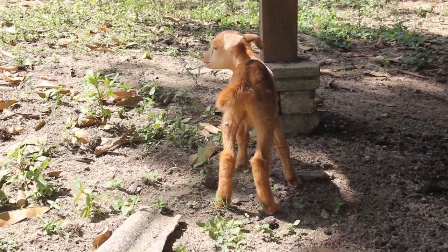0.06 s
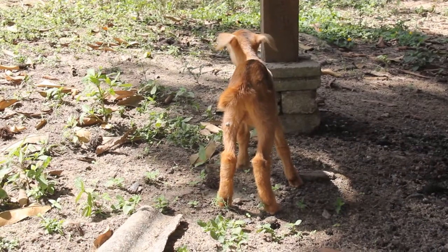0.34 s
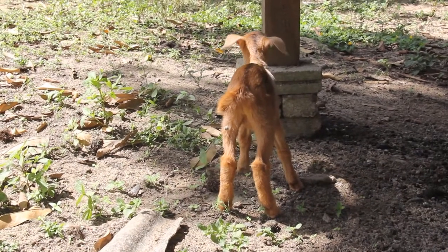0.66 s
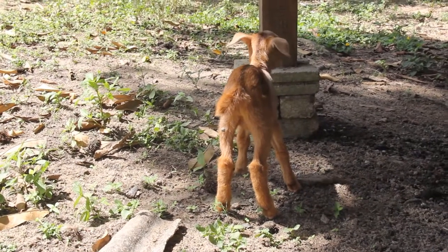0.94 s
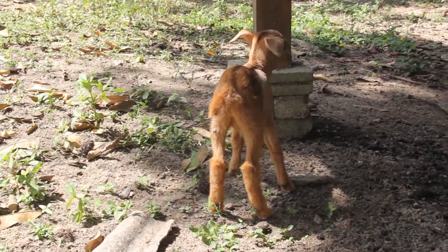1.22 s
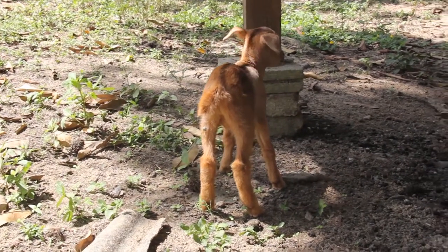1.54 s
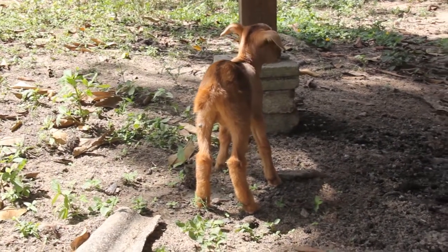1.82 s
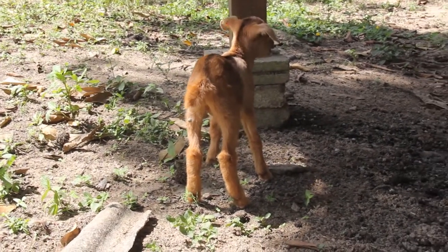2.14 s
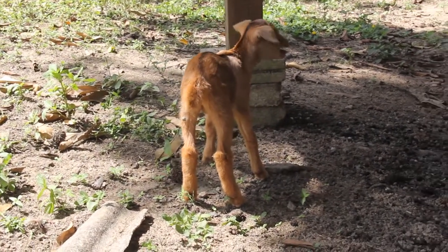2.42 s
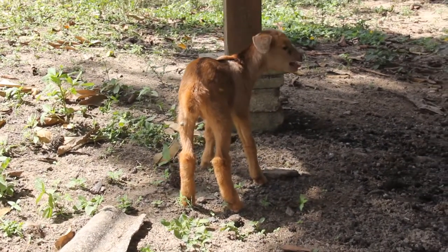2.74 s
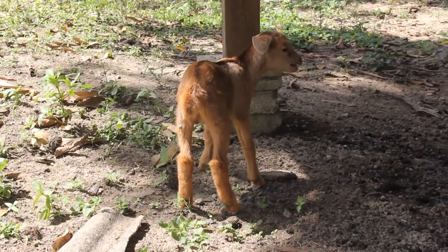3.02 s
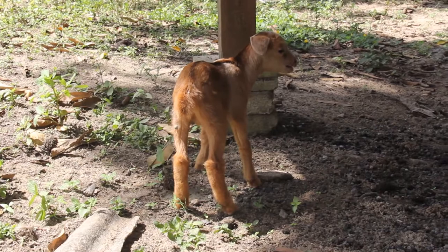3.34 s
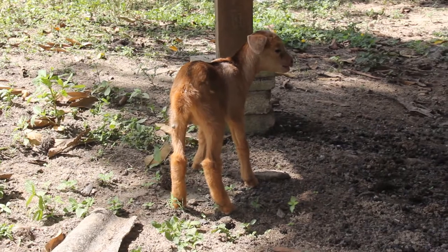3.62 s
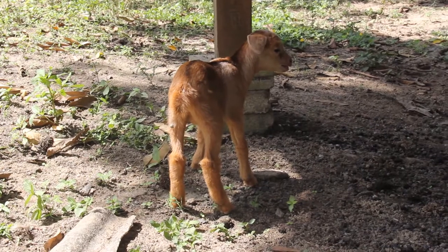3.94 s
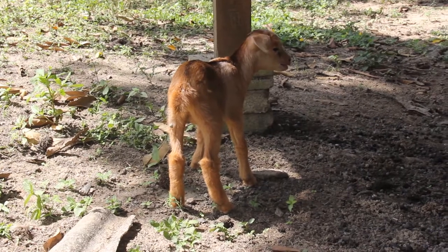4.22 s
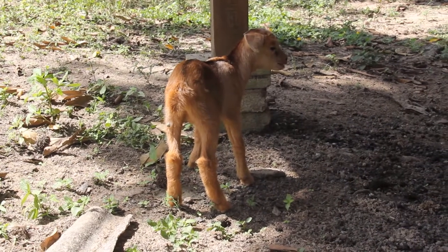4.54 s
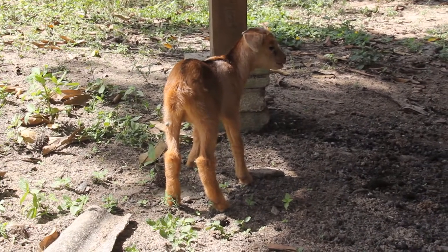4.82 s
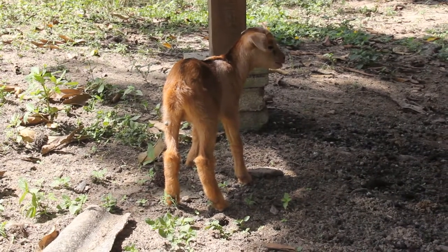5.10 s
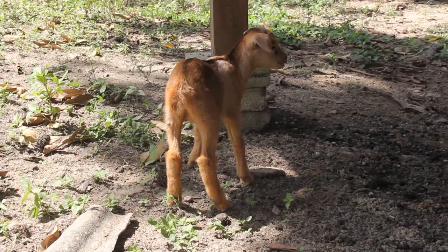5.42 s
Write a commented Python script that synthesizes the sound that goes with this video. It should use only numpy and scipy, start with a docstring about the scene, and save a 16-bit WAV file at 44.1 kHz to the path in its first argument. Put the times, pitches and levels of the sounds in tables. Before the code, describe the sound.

Faint bird whistles over soft air, then a goat kid bleats close by, a lower goat replies, and a turkey and hens call.

```python
"""A low stir of air, insects and a rustle in dry litter open a farmyard; a small bird gives falling whistles.
A goat kid bleats close by and an older goat answers; then a turkey gobbles and hens whine and cluck.
Goats and fowl follow the source-filter principle: vibrating membranes send pulses through a resonant
throat. The whistles are gliding sine tones; air, insects and rustles are filtered noise.
The sheds give a short echo."""
import sys
import numpy as np
from scipy import signal
from scipy.fft import rfft, irfft
from scipy.io import wavfile
from scipy.ndimage import uniform_filter1d

SR = 44100
rng = np.random.default_rng(int(sys.argv[2]) if len(sys.argv) > 2 else 0)


def unload_audio(sound):
    """Save the sound as a 16-bit wav file, at the path given as the first command line argument."""
    columns = np.transpose(np.atleast_2d(sound))
    # keep every value between -1 and 1, then stretch to whole-number steps
    steps = np.round(np.clip(columns, -1, 1) * 32767)
    wavfile.write(sys.argv[1], SR, steps.astype(np.int16))


N = 250047
TIME = np.arange(N) / SR
EDGE_HZ = 15850  # upper band limit

# Throbs of the kid's bleat: centre_s, relative_db, pitch_hz, bend_share, glide_share
KID_THROBS = [(2.174, -27, 742, -0.067, 0.088), (2.264, -12.5, 770, 0.039, 0.029),
              (2.358, -11, 708, 0.061, 0.015), (2.455, -10.5, 752, 0.011, 0.02),
              (2.556, -10, 768.5, 0.015, 0.014), (2.664, -13.5, 753, 0.041, 0.039),
              (2.764, -14.5, 765, 0.035, 0.00082)]


def gain_of(db):
    """Amplitude ratio: tenfold for every 20 decibels."""
    return 10 ** (np.asarray(db) / 20)


def unit_rms(x):
    """Normalisation to a mean power of 1."""
    return x / np.sqrt(np.mean(x ** 2) + 1e-20)


def value_at(points, hz):
    """Interpolation on a logarithmic frequency axis."""
    point_hz, value = np.transpose(points)
    return np.interp(np.log(hz + 1), np.log(point_hz + 1), value)


def add(mix, start_s, sound):
    """Superposition: a sound sums into the mix from start_s on."""
    part = mix[max(round(start_s * SR), 0):][:len(sound)]
    part += sound[:len(part)]


def band(x, low_hz, high_hz):
    """Zero-phase band-pass with fourth-order slopes."""
    hz = np.fft.rfftfreq(len(x), 1 / SR) + 0.0014
    return irfft(rfft(x) / np.sqrt((1 + (low_hz / hz) ** 8) * (1 + (hz / high_hz) ** 8)), len(x))


def wander(size, rate_hz):
    """Random modulation: noise of rms 1, band-limited to about rate_hz."""
    return unit_rms(band(rng.standard_normal(size), rate_hz / 20, rate_hz))


def resonate(x, spectrum, size=2048):
    """Minimum-phase filter: the peaks of the spectrum ring after each pulse."""
    log_gain = np.log(gain_of(value_at(spectrum, abs(np.fft.fftfreq(size, 1 / SR)))))
    taps = np.fft.ifft(np.exp(np.conj(signal.hilbert(log_gain)))).real
    return signal.oaconvolve(x, taps[:size // 2])[:len(x)]


def shelf(x, corner_hz, db):
    """Shelving filter: raises or lowers everything above the corner."""
    low = band(x, 0, corner_hz)
    return low + gain_of(db) * (x - low)


def air():
    """Broadband noise of stirring air, slowly modulated in level."""
    # Spectrum of the air: frequency_hz, density_db
    spectrum = [(15, -30), (25, -21.5), (126, -2.5), (324, -12.5), (672, -17.5), (769, -14), (857, -17),
                (1780, -23.5), (2090, -21.5), (2660, -23), (3580, -23.5), (4100, -28.5), (4950, -22),
                (5370, -28.5), (15800, -40)]
    stir = unit_rms(resonate(rng.standard_normal(N), spectrum, size=16384))
    return gain_of(-48) * stir * gain_of(1.9 * wander(N, 3.9))


def insects():
    """Narrow-band noise: a steady sizzle near 5 kHz."""
    # Spectrum of the insects: frequency_hz, gain_db
    spectrum = [(4000, -37.5), (4700, -1), (5050, -3), (5400, -30)]
    return gain_of(-64) * unit_rms(resonate(rng.standard_normal(N), spectrum))


def wind():
    """Turbulence on the microphone: two low noise bands that swell with the gusts."""
    # Gust strength: time_s, buffet_relative_db, rumble_relative_db
    gusts = [(0.0, -61, -43), (0.41, -81, -47), (0.6, -46, -51), (1.03, -47, -41), (1.07, -39, -39),
             (1.14, -61, -50), (1.61, -61, -45), (2.34, -58, -48.5), (2.37, -79, -63), (3.32, -53, -46),
             (4.01, -65, -50), (4.53, -65, -37), (4.64, -68, -49), (4.74, -58, -38), (4.81, -72, -45.5),
             (5.37, -58, -44.5), (5.43, -59, -50), (5.67, -51, -49)]
    time_s, buffet_db, rumble_db = np.transpose(gusts)
    buffet = unit_rms(band(rng.standard_normal(N), 52, 62))
    rumble = unit_rms(band(rng.standard_normal(N), 57, 133.5))
    buffet *= gain_of(np.interp(TIME, time_s, buffet_db) + 0.5)
    rumble *= gain_of(np.interp(TIME, time_s, rumble_db) - 2.5)
    return buffet + rumble


def rustles():
    """Friction in dry litter: grainy noise with a Gaussian rise and an exponential decay."""
    # Movements in the litter: peak_s, rise_s, decay_s, level_db, treble_db, fizz_db
    movements = [(.29, 0.017, 0.011, -44, -12, -5), (0.859, 0.017, 0.072, -47, -24, 0),
                 (1.461, 0.088, 0.2, -51.5, -2.5, 17), (1.85, 0.024, 0.0071, -40, -5.5, -8),
                 (3.73, 0.32, 0.21, -39, -5.5, 26), (4.697, 0.019, 0.038, -22, 11, 4),
                 (5.508, 0.028, 0.045, -42, -12, 26), (5.66, 0.013, 0.028, -43.5, -5, 26)]
    # Spectrum of the litter: frequency_hz, gain_db
    spectrum = [(300, -2), (1100, 1), (2200, -4.5), (3100, -17.5), (4000, -2), (4900, -6), (6300, -12.5),
                (8500, -21), (11000, -37.5), (15000, -61.5)]
    out = np.zeros(N)
    t = np.arange(-4096, 12288) / SR
    grains = resonate(rng.standard_normal(N) * gain_of(2.0 * wander(N, 600)), spectrum)
    for peak_s, rise_s, decay_s, db, treble_db, fizz_db in movements:
        swell = np.exp(-(np.minimum(t, 0) / rise_s) ** 2 - np.maximum(t, 0) / decay_s)
        swish = np.roll(grains, rng.integers(N))[:len(t)]
        swish = shelf(shelf(swish, 1300, treble_db), 8350, fizz_db)
        add(out, peak_s + t[0], gain_of(db) * unit_rms(swish) * swell)
    return out


def bird():
    """Frequency-modulated pure tones: a faint swoop from above, a fading slide, a downward flick."""
    # Whistles: start_s, length_s, relative_db, from_hz, to_hz
    whistles = [(0.438, 0.16, -35, 4096, 3305), (0.764, 0.038, -44, 3300, 2790),
                (1.128, 0.25, -35.5, 4093, 3382), (1.69, .18, -36, 4083, 3556),
                (2.093, 0.1, -44.5, 3560, 3130)]
    swoop_s, flick_s = .04, 0.0338
    swoop_db, fade_db = -18, -6
    out = np.zeros(N)
    for start_s, length_s, db, from_hz, to_hz in whistles:
        t = np.arange(-swoop_s, length_s, 1 / SR)
        progress = np.clip(t / length_s, 0, 1)
        swoop = np.sqrt(np.clip(-t / swoop_s, 0, 1))
        flick = np.clip(1 - (length_s - t) / flick_s, 0, 1)
        hz = from_hz + (to_hz - from_hz) * np.sqrt(progress)  # steepest at first
        hz *= 1 + .24 * swoop - 0.073 * flick
        hz *= 1 + 0.0084 * wander(len(t), 97)
        gate = np.clip((t + swoop_s) / 0.009, 0, 1) * np.clip((length_s - t) / 0.0053, 0, 1)
        level_db = db + swoop_db * np.clip(1 - t / 0.0034, 0, 1) + fade_db * progress
        level_db += 2.35 * wander(len(t), 42)
        tone = np.sqrt(2) * np.sin(2 * np.pi * np.cumsum(hz) / SR)
        add(out, start_s + t[0], gate * gain_of(level_db) * tone)
    return out


def folds(hz, rough, jitter, jitter_hz, closure_rad=.12):
    """Voice source: membranes give a pulse and a puff of noise each cycle. Returns wave and phase."""
    rough = np.clip(rough, 0, 1)
    cycles = np.cumsum(hz * (1 + jitter * np.sqrt(rough) * wander(len(hz), jitter_hz))) / SR
    phase = 2 * np.pi * cycles
    orders = range(1, int(EDGE_HZ / hz.min()) + 1)
    # slow closure delays the upper harmonics and spreads each pulse
    pulses = sum(np.cos(k * phase - closure_rad * k * k) * (k * hz < EDGE_HZ) for k in orders)
    puffs = (0.16 + np.exp(-(cycles % 1) / 0.094)) * rng.standard_normal(len(hz))
    buzz = shelf(unit_rms(pulses), 9800, db=-3.5)
    rasp = shelf(unit_rms(puffs), 6900, db=20)  # the voice is hoarsest at the top
    return (1 - rough) * buzz + rough * rasp, phase


def quaver(t, centre_s, pitch_hz, bend, glide, sag_ratio, bend_s):
    """Pitch modulation: a parabola (bend) and a slope (glide) through each throb, then a sag."""
    nearest = abs(t - centre_s[:, None]).argmin(0)
    offset = (t - centre_s[nearest]) / bend_s
    flank = np.clip(offset, -1, 1)
    curve = 1 + bend[nearest] * flank ** 2 + glide[nearest] * flank
    sag = 1 + (sag_ratio - 1) * np.clip(abs(offset) - 1, 0, 1)
    return uniform_filter1d(pitch_hz[nearest] * curve * sag, size=300)


def bleat(throbs, throat, width_s, bend_s, sag_ratio, slack_db, slack_rough,
          corner_hz, jitter, shimmer_db, closure_rad=.12):
    """Source-filter voice in throbs; between them it slackens, turning lower, hoarser and fainter."""
    centre_s, mouth_db, nose_db, treble_db, pitch_hz, bend, glide, rough = np.broadcast_arrays(*throbs)
    t = np.arange(round((centre_s[0] - .1) * SR), round((centre_s[-1] + .13) * SR)) / SR
    hz = quaver(t, centre_s, pitch_hz, bend, glide, sag_ratio, bend_s)
    offset = (t - centre_s[:, None]) / width_s
    push = np.exp(-abs(offset) ** 2.33)
    slack = gain_of(slack_db) * np.exp(-((offset - .45) / 2.02) ** 2)
    slack_share = slack.sum(0) / (push.sum(0) + slack.sum(0) + 1e-9)
    roughness = np.interp(t, centre_s, rough) + slack_rough * slack_share ** 2
    source, phase = folds(hz, roughness, jitter, jitter_hz=300, closure_rad=closure_rad)
    opening = np.clip(push.sum(0), 0, 1)
    narrowed = resonate(source, np.multiply(throat, [.92, 1]))  # formants sink as the mouth narrows
    voice = opening * resonate(source, throat) + (1 - opening) * narrowed
    voice = shelf(voice, corner_hz, np.interp(t, centre_s, treble_db) - 4 * slack_share)
    voice /= np.sqrt(abs(uniform_filter1d(voice ** 2, size=1500)) + 1e-12)  # running rms of 1
    voice *= gain_of(shimmer_db * wander(len(t), 66))
    hum = np.sqrt(2) * (np.sin(phase) + 0.3 * np.sin(2 * phase))  # the nose passes two harmonics
    out = np.zeros(N)
    add(out, t[0], voice * (gain_of(mouth_db) @ (push + slack)) + hum * (gain_of(nose_db) @ push))
    return out


def kid():
    """A high, open-mouthed bleat. Vocal effort sets the spectral tilt: hard throbs are bright and clean."""
    # Formants of the kid's throat: frequency_hz, gain_db
    throat = [(700, -59), (1100, -20), (1480, 1), (2200, 1), (2900, -5), (3750, -14), (4550, 1.5),
              (5300, -7), (6100, -1), (6900, 0), (7700, -14), (9600, -21.5), (11000, -31), (15500, -40.5)]
    full_effort_db, nose_db = -9.5, -40.5
    centre_s, db, hz, bend, glide = np.transpose(KID_THROBS)
    effort_db = db - full_effort_db
    treble_db = 10.5 + 0.97 * effort_db
    rough = .1 * np.maximum(1 - gain_of(effort_db), 0)
    throbs = (centre_s, db, nose_db, treble_db, hz, bend, glide, rough)
    return bleat(throbs, throat, width_s=.023, bend_s=.021, sag_ratio=.92, slack_db=-15, slack_rough=.36,
                 corner_hz=3100, jitter=0.049, shimmer_db=1.45, closure_rad=.22)


def kid_squeals():
    """Falling whistles near 2 kHz: the kid's third harmonic sags after the throbs,
    and the voice cracks as the bleat starts and stops."""
    # Cracks as the bleat starts and stops: start_s, length_s, level_db, from_hz, to_hz
    cracks = [(2.164, 0.037, -24, 1735, 1560), (2.781, 0.03, -22.5, 1967, 1755)]
    after_throbs = [(throb[0] + .037, 0.031, -33.5, 2130, 1860) for throb in KID_THROBS[1:]]
    out = np.zeros(N)
    for start_s, length_s, db, from_hz, to_hz in cracks + after_throbs:
        progress = np.linspace(0, 1, round(length_s * SR))
        hz = np.interp(progress, [0, 1], [from_hz, to_hz]) * (1 + 0.081 * wander(len(progress), 610))
        tone = np.sqrt(2) * np.sin(2 * np.pi * np.cumsum(hz) / SR)
        add(out, start_s, gain_of(db) * np.sin(np.pi * progress) * tone)
    return out


def pops():
    """Heavily damped oscillations: low pops of a few cycles each."""
    # Pops: start_s, level_db, pitch_hz
    events = [(2.492, -37, 580), (2.784, -30.5, 618), (3.054, -23, 510)]
    rise_s = 0.0017
    out, t = np.zeros(N), np.arange(2000) / SR
    envelope = 2 * t / rise_s * np.exp(1 - t / rise_s)
    for start_s, db, hz in events:
        add(out, start_s, gain_of(db) * envelope * np.sin(2 * np.pi * hz * t))
    return out


def goat():
    """A lower bleat: radiation shifts from nose to mouth, and the voice roughens, as the mouth opens."""
    # Throbs of the reply: centre_s, relative_db, pitch_hz, opening_share, treble_db
    reply = [(2.908, -30, 219.5, 0.17, -12), (3.028, -19, 309.4, 0.22, -3), (3.118, -21, 341.3, 0.27, -2.5),
             (3.23, -17, 374.7, 0.87, -7.5), (3.326, -18, 368, 0.98, -3.5), (3.423, -16, 383.4, 1, -5),
             (3.521, -18, 374.8, 0.95, -3.5), (3.617, -19, 355.7, 0.9, -8.5), (3.711, -18, 300.2, 0.7, -31)]
    # Formants of the older goat's throat: frequency_hz, gain_db
    throat = [(300, -15), (600, -15), (780, 0.5), (1100, -2), (1350, -25.5), (1500, -7), (1850, -16),
              (2280, 0.5), (2550, -2.5), (2900, 1), (3700, 1), (4300, -11.5), (6000, -13.5), (7200, -26),
              (14000, -56)]
    rough_shut, rough_open, bend = .04, 0.19, -.045
    centre_s, db, hz, opening, treble_db = np.transpose(reply)
    opening = np.clip(opening, .01, .99)
    mouth_db, nose_db = db + 20 * np.log10(opening), db + 20 * np.log10(1 - opening)
    rough = rough_shut + (rough_open - rough_shut) * opening
    glide = .016 * np.gradient(hz, centre_s) / hz  # each throb leans towards the next
    throbs = (centre_s, mouth_db, nose_db, treble_db, hz, bend, glide, rough)
    return bleat(throbs, throat, width_s=0.024, bend_s=.023, sag_ratio=.8, slack_db=-11.5,
                 slack_rough=0.68, corner_hz=1380, jitter=0.021, shimmer_db=1.65)


def fowl_note(length_s, db, pitch_hz, rough, overtones_db, shrill_db, arch=.03, glide=0):
    """One arching note of a syrinx, filtered by the throat; period doubling grows with roughness."""
    # Formants of a fowl's throat: frequency_hz, gain_db
    formants = [(120, -30.5), (280, -1), (420, -7), (600, 0.5), (780, 2.5), (1000, -1.5), (1280, -2.5),
                (1600, -8), (2100, -13.5), (2900, -21.5), (3800, -20), (5000, -33), (8000, -44.5),
                (14000, -75)]
    progress = np.linspace(0, 1, round(length_s * SR))
    offset = 2 * np.minimum(np.arange(8192) / len(progress), 1) - 1  # -1 to 1 across the note
    hz = pitch_hz * (1 - arch * offset ** 2 + glide * offset)
    source, phase = folds(hz, rough, jitter=0.062, jitter_hz=430)
    source *= 1 + 0.21 * rough * np.cos(phase / 2)
    source *= gain_of(1.52 * wander(len(source), 120))  # flutter
    throat = np.array(formants, float)
    # the beak shapes each note anew
    throat[:, 1] += 3 * rng.standard_normal(len(throat)) * (throat[:, 0] > 1500)
    voice = shelf(resonate(source, throat), 735, overtones_db)
    voice = shelf(voice, 1500, shrill_db)[:len(progress)]
    return gain_of(db) * unit_rms(voice) * abs(np.sin(np.pi * progress)) ** 0.59


def chatter(count=20):
    """Soft notes, scattered in time, level and pitch, fill the gobble and swell towards its middle."""
    from_s, to_s, length_s = 3.83, 4.95, 0.048
    out = np.zeros(N)
    for progress, (late, loud, high) in zip(np.linspace(0, 1, count), rng.standard_normal((count, 3))):
        start_s = from_s + progress * (to_s - from_s) + .006 * late
        db = -26 - 7 * (2 * progress - 1) ** 2 + 1.3 * loud
        hz = 683.3 * (1 + .1 * high)
        add(out, start_s, fowl_note(length_s, db, hz, rough=0.39, overtones_db=2, shrill_db=-0.5))
    return out


def hen_whines():
    """Strong overtones give the hens' drawn-out notes a nasal timbre."""
    # Whines: start_s, length_s, level_db, pitch_hz, glide_share, overtones_db
    whines = [(3.934, 0.053, -31, 714, -0.014, 15), (4.002, 0.071, -22, 661, 0.055, 11.5),
              (4.244, 0.0808, -13, 673.7, 0.042, 16.5), (4.444, 0.067, -16, 617, .005, 11.5),
              (4.522, 0.041, -24.5, 774, -.03, 34), (4.628, 0.034, -17.5, 801.5, 0.015, 16),
              (4.827, 0.041, -18, 570.4, -0.0315, 16)]
    out = np.zeros(N)
    for start_s, length_s, db, hz, glide, overtones_db in whines:
        add(out, start_s, fowl_note(length_s, db, hz, rough=0.23, overtones_db=overtones_db,
                                    shrill_db=-6.5, arch=0.0542, glide=glide))
    return out


def turkey_gobble():
    """The syrinx flips between nearly periodic yelps and irregular rattles over a low buzz."""
    # Hollow yelps: start_s, length_s, level_db, pitch_hz
    yelps = [(4.132, 0.013, -11.5, 751), (4.177, 0.025, -8, 790), (4.205, 0.069, -19.5, 848),
             (4.419, .046, -16, 798), (4.48, 0.025, -15, 605), (4.588, .049, -8.5, 745.4),
             (4.666, .075, -22.5, 793), (4.849, 0.042, -16, 564.4), (5.311, 0.027, -30, 1160)]
    # Harsh rattles: start_s, length_s, level_db, pitch_hz
    rattles = [(4.044, 0.048, -11.5, 719), (4.353, .04, -15, 626), (4.385, .04, -12.5, 764),
               (4.748, 0.051, -23.5, 756), (4.802, .05, -17.5, 748.7), (5.106, 0.085, -30.5, 680)]
    buzz_hz, buzz_db = 292.4, -11.5
    out = np.zeros(N)
    for start_s, length_s, db, hz in yelps:
        add(out, start_s, fowl_note(length_s, db, hz, rough=.13, overtones_db=-7.5,
                                    shrill_db=-6.5, arch=.015, glide=0.013))
    for start_s, length_s, db, hz in rattles:
        add(out, start_s, fowl_note(length_s, db, hz, rough=0.56, overtones_db=12.5, shrill_db=-14.5))
        buzz = fowl_note(1.3 * length_s, db + buzz_db, buzz_hz, rough=0.066, overtones_db=-3, shrill_db=-8)
        add(out, start_s, buzz)
    return out


def hen_clucks():
    """Biphonation: the two sides of a hen's syrinx sound together at different pitches."""
    # Closing clucks: start_s, length_s, level_db, pitch_hz
    clucks = [(5.036, .064, -21, 580), (5.238, .053, -23.5, 570.4)]
    out = np.zeros(N)
    for start_s, length_s, db, hz in clucks:
        upper = fowl_note(length_s, db, hz, rough=0.41, overtones_db=-22, shrill_db=4.5, glide=-.04)
        lower = fowl_note(length_s, db - 3.5, hz * .755, rough=0.37, overtones_db=-37,
                          shrill_db=6, glide=-0.033)
        add(out, start_s, upper)
        add(out, start_s - .007, lower)
    return out


def walls(x):
    """Early reflections: dense echoes off nearby boards blur the pulses of a farther voice."""
    t = np.arange(1500) / SR
    taps = rng.standard_normal(len(t)) * (rng.random(len(t)) < .15) * np.exp(-t / 0.008)
    early = signal.oaconvolve(band(x, 1034, EDGE_HZ), taps / np.linalg.norm(taps))[:N]
    return shelf(x, 1100, db=-4) + gain_of(-3) * early


def yard(x, wet_db):
    """Reverberation: a ground reflection, then scatter from sheds and trees that decays band by band."""
    # Reverberation times: frequency_hz, t60_s
    decay_times = [(150, 0.77), (700, 0.26), (2000, 0.59), (5000, 0.51), (12000, 0.083)]
    echoes_per_s, gap_s, ground_delay_s = 2000, .006, .0021
    taps = rng.standard_normal(SR) * (rng.random(SR) < echoes_per_s / SR) * (np.arange(SR) > gap_s * SR)
    hz, t, spectra = signal.stft(taps, SR, nperseg=256)
    decay = gain_of(-60 * t / value_at(decay_times, hz)[:, None])
    tail = signal.istft(spectra * decay, SR, nperseg=256)[1]
    echoes = signal.fftconvolve(x, tail / np.linalg.norm(tail))[:N]
    bounce = np.interp(TIME - ground_delay_s, TIME, x)
    return x + 0.035 * bounce + gain_of(wet_db) * echoes


def scene():
    """The ratio of direct to reverberant sound tells distance: the kid is nearest, the bird farthest."""
    young = kid() * gain_of(-3.5) + kid_squeals()
    old = goat() * gain_of(-2.5)
    near = yard(young, wet_db=-23) + yard(walls(old), wet_db=-13)
    fowl = chatter() + hen_whines() + turkey_gobble() + hen_clucks()
    far = yard(walls(fowl) + pops() + rustles(), wet_db=-11)
    far += yard(bird() * gain_of(-2.5), wet_db=-9)
    return (near + far + air() + insects() + wind())[None]


def record(dry):
    """Band limiting: a linear-phase low-pass at EDGE_HZ."""
    low_pass = signal.firwin(511, EDGE_HZ, window=("kaiser", 9), fs=SR)
    return signal.oaconvolve(dry, low_pass[None], "same")


dry = scene()
out = record(dry)
unload_audio(out)
```